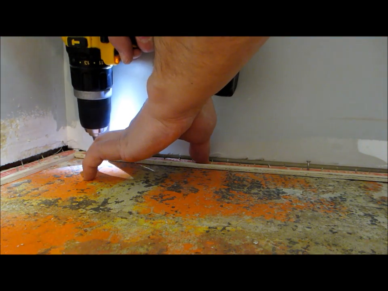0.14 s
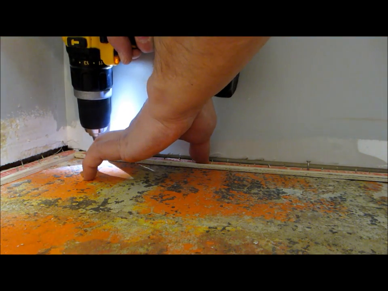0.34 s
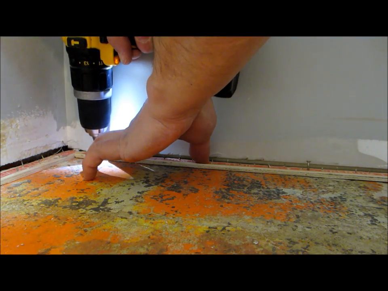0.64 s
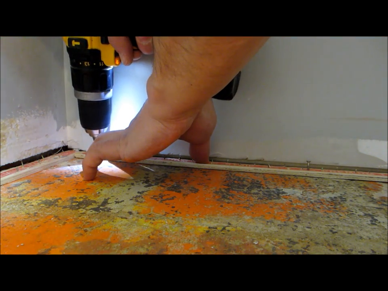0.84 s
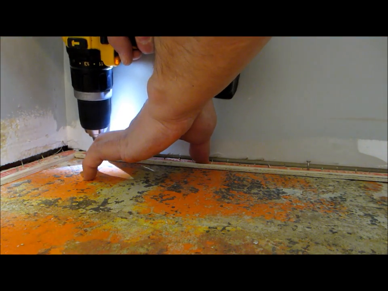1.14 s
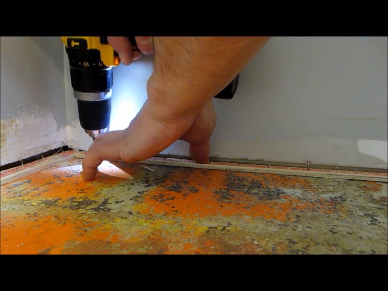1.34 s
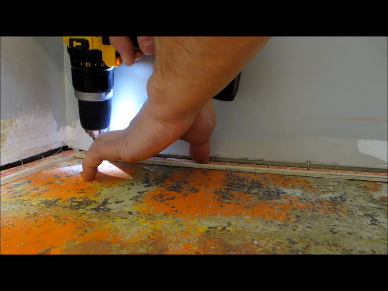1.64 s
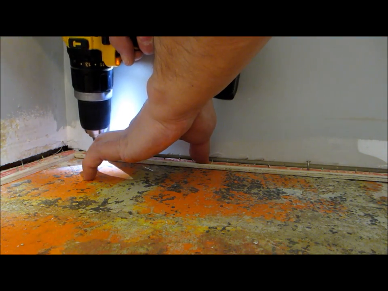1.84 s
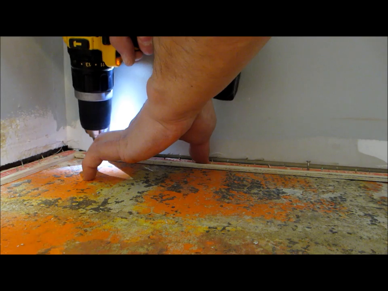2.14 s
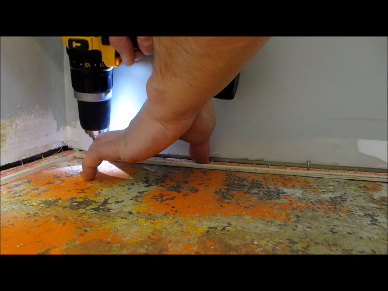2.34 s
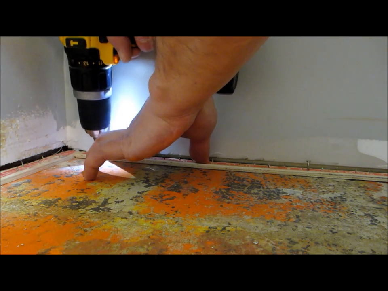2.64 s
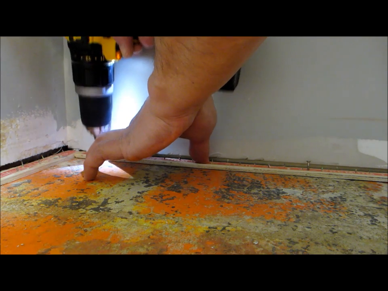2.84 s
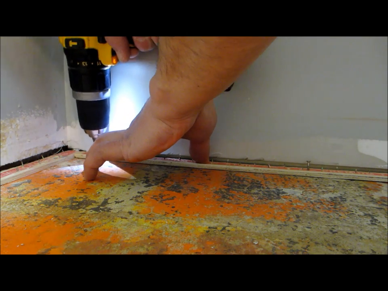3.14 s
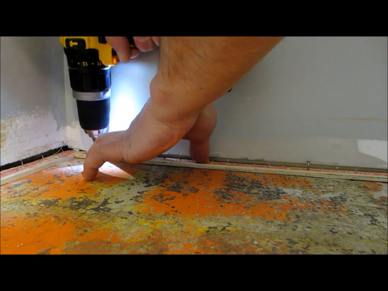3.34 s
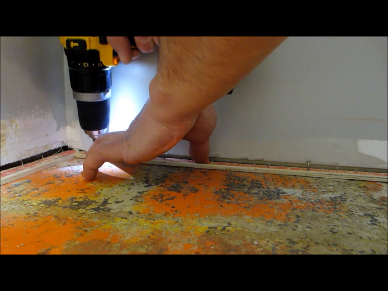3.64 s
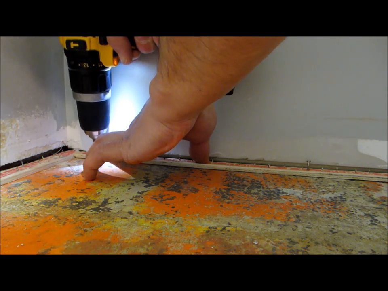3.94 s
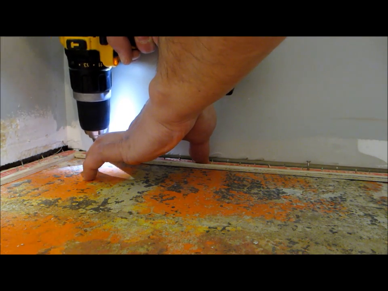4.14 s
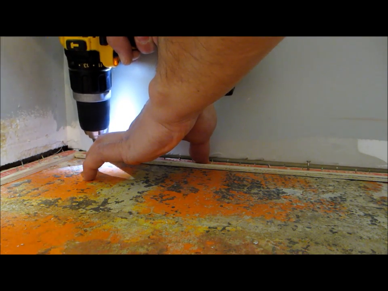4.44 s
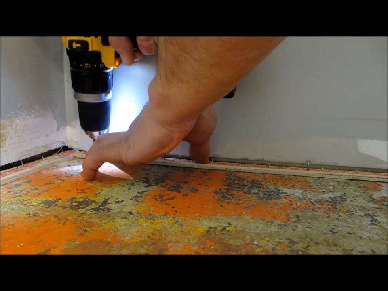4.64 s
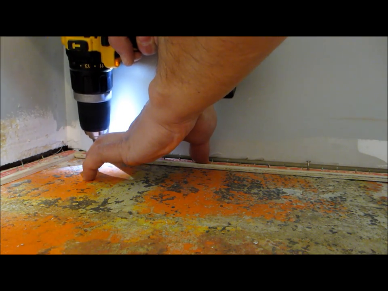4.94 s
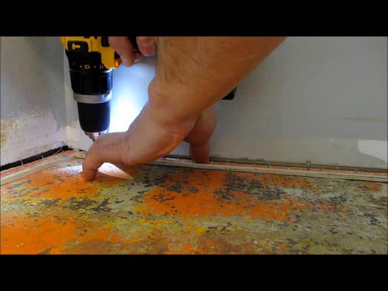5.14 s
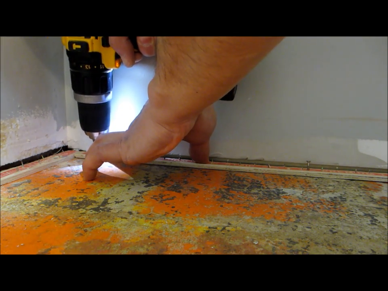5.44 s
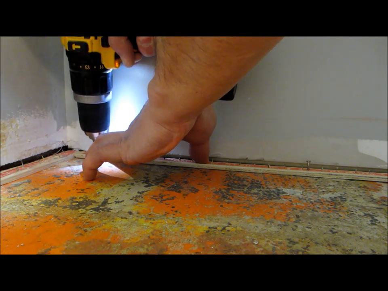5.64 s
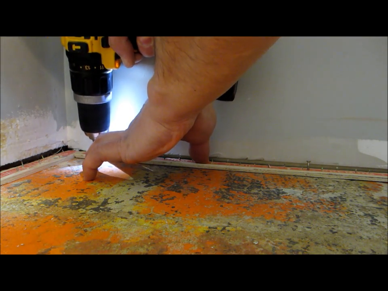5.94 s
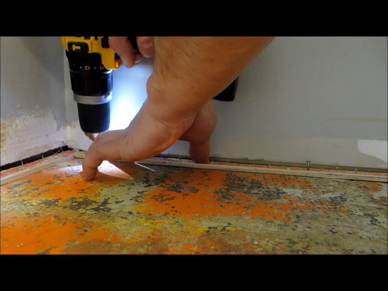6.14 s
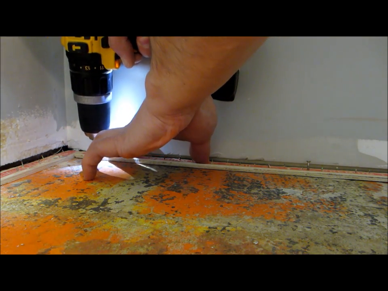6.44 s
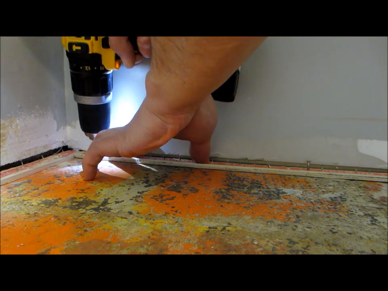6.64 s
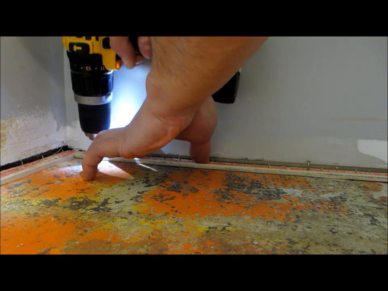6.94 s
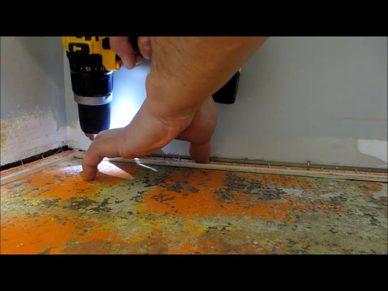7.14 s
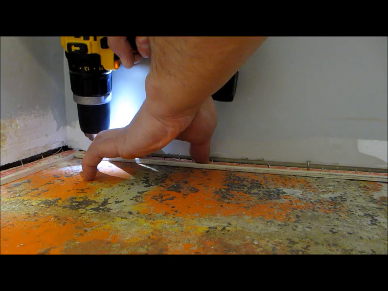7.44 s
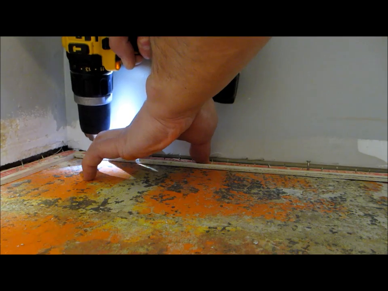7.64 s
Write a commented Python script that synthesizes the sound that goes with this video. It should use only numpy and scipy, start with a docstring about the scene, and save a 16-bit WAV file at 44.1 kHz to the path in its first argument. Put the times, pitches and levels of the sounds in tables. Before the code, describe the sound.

A cordless drill buzzes steadily under load close by, eases off briefly to a thin whirr, then bites down again with rattle and low grinding.

```python
"""A cordless drill bores through a wooden strip into a concrete floor, close by, in a bare room.
Its loaded drive knocks on every second motor turn and rings the housing. Noise makes the hiss and rasp
of the gears, the chuck sways the level once per turn, and the bit grinds and thumps the floor.
The pressure is let off once: the knocking dies and the motor races with a thin whine.
Pressed down again, the drive rattles, seats and sinks under load."""
import sys
import numpy as np
from scipy import signal
from scipy.fft import rfft, irfft
from scipy.io import wavfile
from scipy.ndimage import uniform_filter1d

SR = 44100
rng = np.random.default_rng(int(sys.argv[2]) if len(sys.argv) > 2 else 0)


def digitize_waveform(pressure):
    """Quantize a signal to 16-bit integers and store it at the path in sys.argv[1].

    Rows of a 2-D input are taken as channels; values are limited to [-1, 1].
    """
    field = np.atleast_2d(pressure).T
    bounded = np.clip(field, -1, 1)
    quanta = np.round(bounded * 32767).astype(np.int16)
    wavfile.write(sys.argv[1], SR, quanta)


N = 343538
TIME = np.arange(N) / SR

# the lift: when it starts, when the drill is pressed down again and how long that takes
LIFT_S, PRESS_S, PRESS_TAKES_S = 2.594, 2.993, 0.0058
# while lifted the knocking fades at this rate, down to the second value
FADE_DB_PER_S, FREE_KNOCK_DB = 119, -38


def from_db(db):
    """Decibels to gain."""
    return 10 ** (np.asarray(db) / 20)


def rms_one(x):
    """Scale to an average strength (rms) of 1."""
    return x / np.sqrt(np.mean(x ** 2) + 1e-20)


def moving_rms(x, length, floor=0):
    """The strength of a sound around each moment."""
    return np.sqrt(uniform_filter1d(x ** 2, length) + floor)


def in_time(rows):
    """A (seconds, value) curve at every sample."""
    seconds, value = np.transpose(rows)
    return np.interp(TIME, seconds, value)


def over_bins(points):
    """A (Hz, value) table at every FFT bin, on a log axis."""
    hz, value = np.transpose(points)
    bin_hz = np.arange(N // 2 + 1) * SR / N
    return np.interp(np.log(bin_hz + 1), np.log(hz), value)


def ramp(start_s, length_s):
    """Rises from 0 to 1 in a straight line."""
    return np.clip((TIME - start_s) / max(length_s, 1e-4), 0, 1)


def drift(rate):
    """Smooth random wandering of rms 1 that changes about rate times a second."""
    width = max(int(SR / rate), 2)
    smooth = uniform_filter1d(rng.standard_normal(N), width, mode="wrap")
    return rms_one(uniform_filter1d(smooth, width, mode="wrap"))


# How alike left and right noise are.
# Each row: pitch in Hz, likeness from 0 (unrelated) to 1 (the same).
NOISE_LIKENESS = [(40, 0.85), (200, 1), (1000, 0.84), (2500, 0.83), (5000, 1), (9000, 0.56), (14000, 0.88)]


def noise(spectrum):
    """Coloured noise, left and right, whose likeness depends on pitch."""
    mid, side = rfft(rng.standard_normal((2, N))) * from_db(over_bins(spectrum))
    alike = np.clip(over_bins(NOISE_LIKENESS), 0, 1)
    return rms_one(irfft(np.sqrt(1 + alike) * mid + np.sqrt(1 - alike) * side * [[1], [-1]], N))


def resonate(force, modes):
    """Parallel resonances with alternating signs ring when a force drives them."""
    out = 0
    for k, (hz, width, db) in enumerate(modes):
        radius = np.exp(-np.pi * width / SR)
        poles = [1, -2 * radius * np.cos(2 * np.pi * hz / SR), radius ** 2]
        gain = (-1) ** k * from_db(db) * (1 - radius ** 2) / 2
        # the tiny offset keeps the filter from slowing down on silence
        out = out + gain * signal.lfilter([1, 0, -1], poles, force + 1e-18)
    return out


def blows(rows):
    """One click for each (seconds, dB) row."""
    out = np.zeros(N)
    for s, db in rows:
        out[int(s * SR)] += from_db(db)
    return out


def passes(turns):
    """The samples at which a turn is completed."""
    return np.flatnonzero(np.diff(np.floor(np.maximum.accumulate(turns))) > 0)


# Colour of the faint sound of the room itself. Each row: pitch in Hz, relative level in dB.
ROOM_COLOUR = [(20, -30), (60, -9), (110, 8), (300, -10), (1000, -42)]


def room_tone(level_db):
    """Quiet steady noise, strongest in the bass."""
    return from_db(level_db) * noise(ROOM_COLOUR)


def room(x, t60=0.95, wet_db=-18):
    """A short diffuse tail of fading noise stands for the echoes, different left and right."""
    t = TIME[:SR // 2]
    tail = rng.standard_normal((2, len(t))) * from_db(-60 * t / t60) * (t > .004)
    tail /= np.sqrt(np.sum(tail ** 2, axis=1, keepdims=True))
    return x + from_db(wet_db) * signal.fftconvolve(x, tail, axes=1)[:, :N]


# Level difference of the two sides. Each row: pitch in Hz, left minus right in dB.
LEFT_LOUDER = [(60, 18), (150, 13), (420, 10.5), (600, 6.5), (820, 6.5), (1020, 4), (1200, 1), (1650, -4),
               (2050, 3), (3200, -0.5), (6500, 0), (9000, -2), (12500, -2), (15000, 1.5)]
# Phase difference of the two sides. Each row: pitch in Hz, lead of the left in radians.
LEFT_LEADS = [(450, -1.42), (650, -1.15), (1020, -1.4), (1400, -.8), (2000, -.2), (3500, 0), (6300, 0),
              (7000, .5), (8800, .4), (12000, 1.2), (14000, 2.0)]


def left_and_right(x):
    """Give the sides a level and phase difference that changes with pitch."""
    half = from_db(over_bins(LEFT_LOUDER) / 2) * np.exp(.5j * over_bins(LEFT_LEADS))
    pair = np.array([half, 1 / half])
    return irfft(rfft(x) * pair / np.abs(pair.mean(axis=0)), N)


# Drive speed before the lift. Each row: time in seconds, knocks per second.
SPEED_BEFORE_LIFT = [(0.0, 207.5), (0.03, 205.6), (0.98, 204.5), (1.55, 200.2), (1.69, 203.2),
                     (1.93, 195.3), (2.01, 201.3), (2.4, 198.0), (2.6, 200.3)]
# Drive speed after the lift. Each row: time in seconds, knocks per second.
SPEED_AFTER_LIFT = [(3.0, 240.4), (3.17, 221.6), (3.27, 223.7), (3.59, 209.1), (4.04, 201.8), (4.11, 207.6),
                    (4.53, 205.6), (4.65, 200.3), (5.04, 198.9), (6.96, 200.1), (7.07, 197.1),
                    (7.28, 200.4), (7.41, 197.3), (7.79, 200.1)]


def drive_speed(spin_up_s=.09):
    """Knocks per second, one per two motor turns; freed of its load, the motor nears its top speed."""
    speed = in_time(np.vstack([SPEED_BEFORE_LIFT, SPEED_AFTER_LIFT]))
    (freed_s, loaded), (caught_s, top) = SPEED_BEFORE_LIFT[-1], SPEED_AFTER_LIFT[0]
    racing = top + (loaded - top) * np.exp(-np.maximum(TIME - freed_s, 0) / spin_up_s)
    return np.where((TIME > freed_s) & (TIME < caught_s), racing, speed)


def motor_load(speed, strain_hz=203.3, strain_width_hz=1.2):
    """Load from 0 to 1: heavy when it drags the speed below strain_hz knocks per second."""
    return .5 + .5 * np.tanh((strain_hz - speed) / strain_width_hz)


def load_surge(load, surge_s=0.096):
    """How far the load stands above its recent mean."""
    keep = np.exp(-1 / (surge_s * SR))
    return np.maximum(load - signal.lfilter([1 - keep], [1, -keep], load), 0)


def chuck_angle(knocks, first_turn=0.6, second_turn=0.97):
    """The chuck turns once in 17 motor turns; the bit is seated anew after the lift."""
    turns = knocks * 2 / 17
    pressed = int(PRESS_S * SR)
    return turns - np.where(np.arange(N) < pressed, first_turn, second_turn + turns[pressed] % 1)


# Push of the hand, in two blocks, before and after the lift.
# Each row: time in seconds, level of the knocking in dB before the shared gain.
HAND_PUSH = [
    [(0.05, -24), (0.73, -23), (0.79, -25), (1.93, -22.5), (2.46, -24.5), (2.5, -23.5)],
    [(3.05, -30), (3.1, -26), (3.26, -28), (3.42, -22), (7.21, -25), (7.75, -22.5)],
]


def push_level():
    """The hand's changing pressure sets how hard the drive knocks."""
    return in_time(np.vstack(HAND_PUSH))


def lift_db():
    """Level lost while the drill is lifted."""
    fade = np.maximum(-FADE_DB_PER_S * np.maximum(TIME - LIFT_S, 0), FREE_KNOCK_DB)
    return fade * (1 - ramp(PRESS_S, PRESS_TAKES_S))


def seating(slacken_s=2.56, every_turn_until_s=3.135, seated_s=3.32, settle_s=.03,
            seated_looseness=0.16, rattle_looseness=0.72, skipped_knock_share=0.013):
    """Strength of the in-between knocks and looseness of the drive, both 0-1, around the lift."""
    # the drive slackens just before the lift; pressed again, it first knocks on every turn
    slack = ramp(slacken_s, settle_s)
    between = np.maximum(skipped_knock_share, slack * (1 - ramp(every_turn_until_s, settle_s / 2)))
    # it rattles until it is seated, and is fully slack while lifted
    rattle = rattle_looseness * slack * (1 - ramp(seated_s, settle_s))
    lifted = ramp(LIFT_S, settle_s) * (TIME < PRESS_S)
    return between, np.maximum(np.maximum(seated_looseness, rattle), lifted)


# Colour of the fan's breath. Each row: pitch in Hz, relative level in dB.
FAN_COLOUR = [(60, -64), (200, -21), (330, -11.5), (480, 0.5), (700, 2), (950, 4), (1300, 8), (1550, -4.5),
              (2000, -21)]


def fan(fade_db, level_db=-30, free_db=-18.5):
    """A fan on the motor shaft blows air, softer by up to free_db while the drill is lifted."""
    return from_db(level_db + np.maximum(fade_db, free_db)) * noise(FAN_COLOUR)


# Ringing tones of the bit's shaft. Each row: pitch in Hz, width in Hz, level in dB.
SHAFT_TONES = [(7230, 230, -29.5), (10350, 360, -23)]


def shaft(rings_s=1.6, rise_s=.25, fade_s=0.46):
    """Pressed again, rubbing in the hole rings the steel shaft until the deeper cut damps it."""
    gate = ramp(PRESS_S, rise_s) * (1 - ramp(PRESS_S + rings_s, fade_s))
    return gate * resonate(rng.standard_normal(N), SHAFT_TONES)


# Clacks of the gear train on lifting and pressing down.
# Each row: time in seconds, relative strength in dB.
GEAR_CLACKS = [(2.681, -7), (2.995, 2), (3.005, -1)]


def clacks(ring_db=16, thud_db=-8, snap_db=-25, snap_s=.0014):
    """Play between the gears closes: the housing rings, the floor thuds and the teeth snap."""
    force, t = blows(GEAR_CLACKS), TIME[:SR // 50]
    snap = signal.fftconvolve(force, rng.standard_normal(len(t)) * np.exp(-t / snap_s))[:N]
    ring = from_db(ring_db) * resonate(force, HOUSING_TONES)
    return ring + from_db(thud_db) * resonate(force, FLOOR_TONES) + from_db(snap_db) * snap


# Thin whine of the free-running drive.
# Each row: pitch in Hz when the drive is at whine_speed_hz, typical level in dB.
WHINE_TONES = [(5190, -60), (5911, -55.5), (9733, -60), (10850, -56), (11246, -59), (11750, -52)]


def idle_whine(speed, lifted, whine_speed_hz=237):
    """Faint unsteady tones creep upward with the motor while it runs free."""
    out = 0
    for hz, db in WHINE_TONES:
        turns = np.cumsum(hz * speed / whine_speed_hz + 12 * drift(300)) / SR
        out = out + from_db(db + 3 * drift(40)) * np.sin(2 * np.pi * turns)
    return lifted * out


# Colour of the teeth's hiss. Each row: pitch in Hz, relative level in dB.
HISS_COLOUR = [(2000, -24.5), (3500, -8.5), (4340, -6), (5030, -8), (6500, -7.5), (7250, -4), (7900, -5),
               (8600, -3.5), (9350, 3.5), (9850, 0.5), (10400, 1.5), (12300, -2.5), (13500, -5.5),
               (15800, -8)]
# Colour of the teeth's rasp. Each row: pitch in Hz, relative level in dB.
RASP_COLOUR = [(300, -59), (1400, -13.5), (1750, 0.5), (2250, 0.5), (2600, -1), (3300, -4), (4200, -13),
               (6000, -26.5)]


def gears(knocks, wobble, load, pulse_db=1.16, wobble_db=0.38, grit_db=1.5, rasp_db=-5.0,
          rasp_pulse_db=2.0, rasp_load_db=1, rasp_surge_db=5.5):
    """Teeth hiss just before each knock and rasp in step with it; single grains make both flicker."""
    hiss_pulse = pulse_db * np.cos(2 * np.pi * (knocks + 0.082))
    hiss = noise(HISS_COLOUR) * from_db(hiss_pulse + grit_db * drift(1500) + 0.67 * drift(76))
    rasp_pulse = rasp_pulse_db * np.cos(2 * np.pi * (knocks - .25))
    rasp = noise(RASP_COLOUR) * from_db(rasp_pulse + 0.5 * drift(400))
    # a fresh rise in load makes the teeth rasp harder for a moment
    strain_db = rasp_load_db * load + rasp_surge_db * load_surge(load)
    both = rms_one(hiss) + from_db(rasp_db + strain_db) * rms_one(rasp)
    return both * from_db(wobble_db * wobble)


def hiss_level(load, push, fade_db, level_db=-27.5, load_db=-0.75, free_db=-13.5, push_share=0.27):
    """Gear level in dB: it sinks under load and on lifting, and follows the push a little."""
    follow_db = push_share * np.clip(push - np.median(push), -1, 2)
    return level_db + load_db * load + np.maximum(fade_db, free_db) + follow_db


# Colour that the gearbox gives its overtones. Each row: pitch in Hz, typical level in dB.
BUZZ_COLOUR = [(1520, -49), (1640, -39.5), (1720, -54), (1790, -46), (1890, -59), (2000, -40), (2120, -40),
               (2220, -43), (2320, -39.5), (2480, -50.5)]


def buzz(speed, knocks, flicker_db=3, waver=0.73):
    """Gear overtones, 8 to 12 times the knock rate, come and go, each wavering on its own."""
    out, (hz, colour_db) = 0, np.transpose(sorted(BUZZ_COLOUR))
    for multiple in range(8, 13):
        level_db = np.interp(multiple * speed, hz, colour_db) + flicker_db * drift(25)
        out = out + from_db(level_db) * np.sin(2 * np.pi * multiple * knocks + waver * drift(46))
    return np.sqrt(2) * out


# Resonances that the rotor's notes sweep through.
# Each row: pitch in Hz, width in Hz, peak level in dB.
ROTOR_RESONANCES = [(444, 33.5, -30), (472, 46, -30.5), (816.3, 37, -30)]


def rotor_gain(hz, base_db):
    """A rotor note swells as it passes through a resonance."""
    peaks = sum((from_db(db) / (1 + (2 * (hz - centre) / width) ** 2)) ** 2
                for centre, width, db in ROTOR_RESONANCES)
    return np.sqrt(from_db(base_db) ** 2 + peaks)


def rotor(speed, knocks, chuck, wobble_db, between, swell=1.7, flute_swell=0.44, swell_turn=0.7,
          octave_turn=0.44, first_db=-38, octave_db=-46, every_turn_db=-29):
    """Unbalance gives a note that swells with the chuck's turn, and an octave without that swell."""
    hz, angle, chuck_rad = 2 * speed, 2 * np.pi * 2 * knocks, 2 * np.pi * (chuck + swell_turn)
    swing = swell * np.cos(chuck_rad) - flute_swell * np.cos(2 * chuck_rad)
    throb = from_db(wobble_db * swing)
    throb /= moving_rms(throb, SR // 6)
    first = rotor_gain(hz, first_db) * throb * np.sin(angle)
    # pressed down again, the octave is strong while every turn knocks
    octave_gain = rotor_gain(2 * hz, octave_db) + from_db(every_turn_db) * between * (TIME > PRESS_S)
    octave = octave_gain * np.sin(2 * angle + 2 * np.pi * octave_turn + 0.1 * drift(39))
    return np.sqrt(2) * (first + octave)


# Spells in which the bit bites into the floor.
# Each row: start in seconds, end in seconds, grinding in dB, thumping in dB, before the shared gains.
BITE_SPELLS = [(3.344, 4.39, -45.5, -41), (4.58, 5.253, -35.5, -37), (5.27, 5.728, -43, -46),
               (6.336, 6.854, -49, -59), (6.946, 7.267, -40.5, -44), (7.546, 7.79, -63, -46)]


def bite_levels(attack_s=0.059, release_s=0.13, skating_db=-104):
    """Grinding and thumping in dB: each cut sets in, holds and lets go; in between the tip skates."""
    spells = []
    for start, end, *levels_db in BITE_SPELLS:
        shape = ramp(start, attack_s) * (1 - ramp(end, release_s)) ** 2
        spells.append(np.outer(from_db(levels_db), shape))
    return 20 * np.log10(from_db(skating_db) + np.max(spells, axis=0))


# The bit catches hard on grit. Each row: time in seconds, relative strength in dB.
GRIT_CATCHES = [(3.402, -4), (3.491, 2), (3.569, -1), (3.777, -3), (3.941, 2), (4.026, -2), (4.276, -1),
                (4.564, -5), (4.642, -2), (5.2, 0), (5.412, 0), (5.49, -3), (5.71, -2), (7.166, -4)]
# Ringing tones of the floor. Each row: pitch in Hz, width in Hz, relative level in dB.
FLOOR_TONES = [(117, 79, 5.5), (201, 72, 12), (324, 210, 6)]
# Colour of the grinding. Each row: pitch in Hz, relative level in dB.
GRIND_COLOUR = [(15, -45), (45, -30), (110, 10), (220, 14.5), (300, 15.5), (385, 20), (500, -20)]


def bit(knocks, chuck, drive_db, level_db, thump_db, grind_db=-1, bite_db=42.0, catch_db=6,
        bite_turn=0.091, hum_db=-32.5, bite_hum_db=-2.0):
    """The tip grinds and bites once per turn, thumping the floor, which also hums with the knocks."""
    grinding = from_db(level_db + grind_db) * noise(GRIND_COLOUR)
    at = passes(chuck - bite_turn)
    bites = np.zeros(N)
    uneven_db = rng.uniform(-7, 4, len(at))
    bites[at] = from_db(thump_db[at] + bite_db + uneven_db)
    thumps = resonate(bites + from_db(catch_db) * blows(GRIT_CATCHES), FLOOR_TONES)
    hum_gain = from_db(drive_db + hum_db) + from_db(level_db + bite_hum_db)
    return grinding + thumps + hum_gain * np.sin(2 * np.pi * knocks)


def chuck_wobble(chuck):
    """The bit binds and frees once per turn, never twice quite alike."""
    grip = 1.1 + .3 * drift(18)
    return grip * (np.cos(2 * np.pi * chuck) - 0.57 * np.cos(4 * np.pi * chuck))


def wobble_depth(bite_db, free_wobble_db=2, steadied_share=.75, firm_bite_db=-40):
    """Depth in dB of the swing with each chuck turn; a firm cut holds the bit and steadies it."""
    return free_wobble_db * (1 - steadied_share * np.minimum(from_db(bite_db - firm_bite_db), 1))


def shell(x, lowest_hz=170):
    """The small plastic shell radiates little bass."""
    return signal.sosfilt(signal.butter(2, lowest_hz, "high", fs=SR, output="sos"), x)


# Ringing tones of the housing. Each row: pitch in Hz, width in Hz, relative level in dB.
HOUSING_TONES = [(584.7, 51, -7.5), (812, 52, -6.5), (1043, 181, -1), (1240, 187, 0.5), (1392, 88, -4.5),
                 (1712, 92, -13), (1981, 25, -14), (2200, 130, -21.5)]


def housing(knocks, wobble, between, loose, jitter=0.0089, wander=0.028, sway=0.01,
            uneven_db=3.8, scrape=.075):
    """Knocks on motor turns ring the housing; under load every other one all but drops out."""
    turns = 2 * (knocks + jitter * loose * drift(320) + wander * drift(20) + sway * wobble)
    at = passes(turns)
    in_between = np.floor(turns[at + 1]) % 2
    unevenness = from_db(uneven_db * loose * drift(120))
    force = np.zeros(N)
    force[at] = np.where(in_between, between[at], 1) * unevenness[at]
    # a fully slack drive only scrapes; the parts scrape most while they are in contact
    force *= 1 - np.clip(loose, 0, 1) ** 4
    contact = 1 + 0.83 * np.cos(2 * np.pi * knocks)
    force += scrape * loose * rng.standard_normal(N) * contact
    ring = resonate(force, HOUSING_TONES)
    # even out the strength, so that the caller sets the level
    return ring / moving_rms(ring, SR // 12, 1e-12)


def scene(push_db=3.5, body_db=-0.5, quiet_db=-71, hum_load_db=4):
    """All parts follow the same turning drive."""
    speed, fade_db = drive_speed(), lift_db()
    knocks = np.cumsum(speed) / SR
    chuck = chuck_angle(knocks)
    load = motor_load(speed)
    lifted = fade_db / FREE_KNOCK_DB
    between, loose = seating()
    bite_db, thump_db = bite_levels()
    push = push_level()
    drive_db = push + push_db + fade_db
    wobble, wobble_db = chuck_wobble(chuck), wobble_depth(bite_db)

    air = fan(fade_db)
    teeth = from_db(hiss_level(load, push, fade_db)) * gears(knocks, wobble, load)
    tones = rotor(speed, knocks, chuck, wobble_db, between) + buzz(speed, knocks)
    notes = from_db(fade_db) * (1 - lifted) ** 2 * tones
    # heavy load makes the floor hum louder
    floor = bit(knocks, chuck, drive_db + hum_load_db * load, bite_db, thump_db)
    unsteady_hand = from_db(.55 * drift(12))
    body_gain = from_db(drive_db + wobble_db * wobble + body_db) * unsteady_hand
    body = body_gain * housing(knocks, wobble * wobble_db / 2, between, loose)

    drill = shell(body + air) + notes + teeth + shaft() + clacks() + idle_whine(speed, lifted)
    return left_and_right(room(drill + floor)) + room_tone(quiet_db)


def record(dry, cutoff_hz=15900):
    """The top of the treble is cut steeply."""
    return signal.sosfilt(signal.ellip(12, .1, 90, cutoff_hz, fs=SR, output="sos"), dry)


dry = scene()
out = record(dry)
digitize_waveform(out)
```